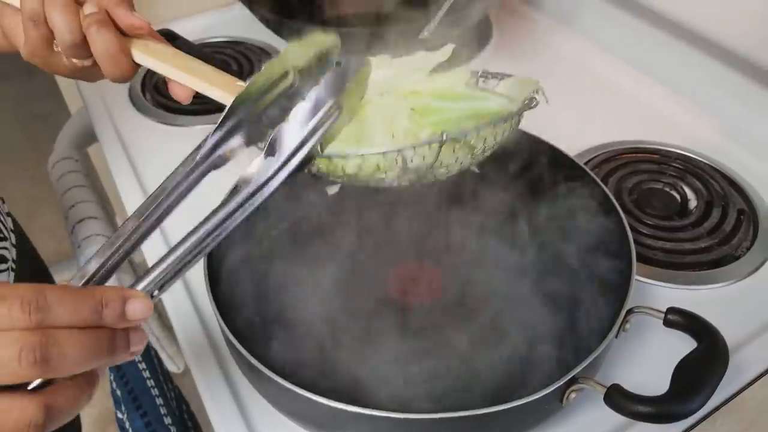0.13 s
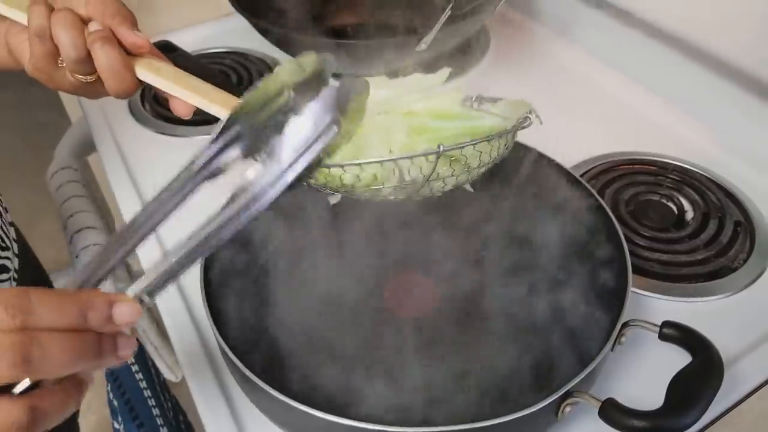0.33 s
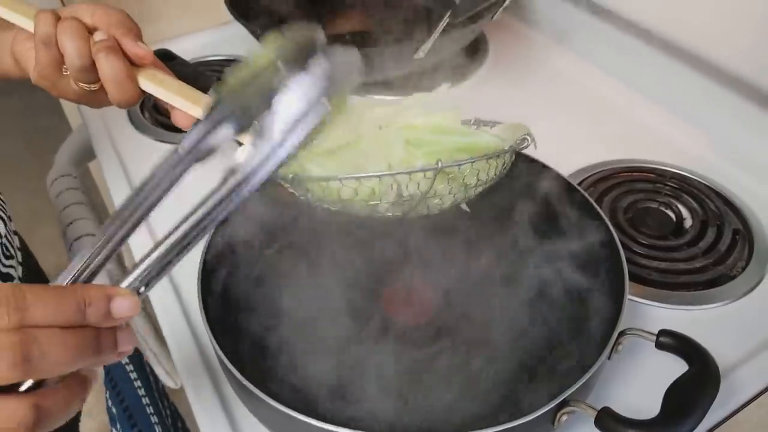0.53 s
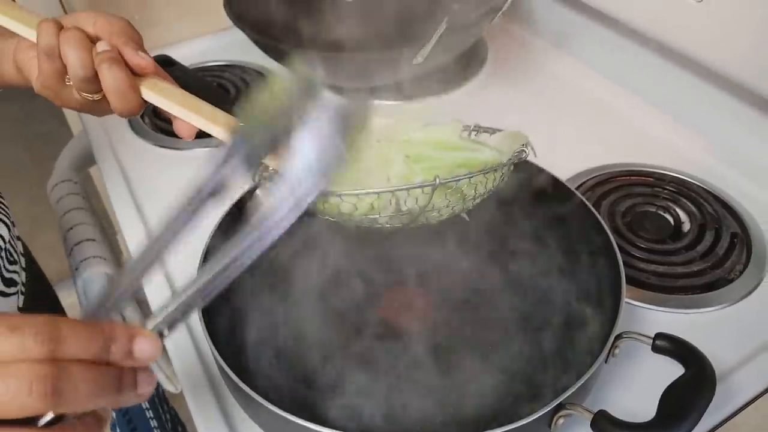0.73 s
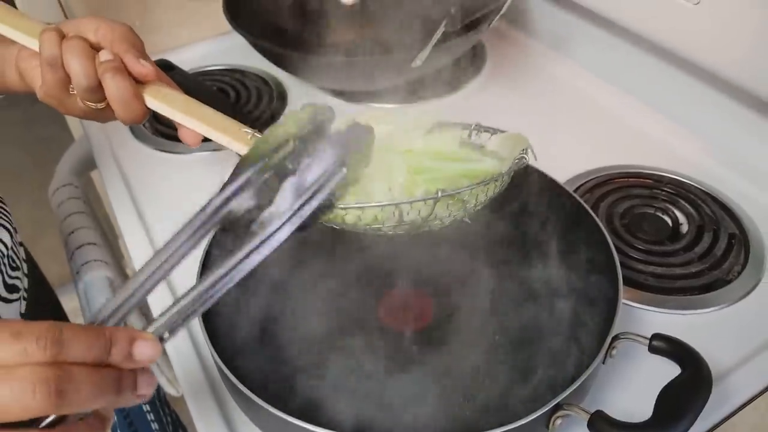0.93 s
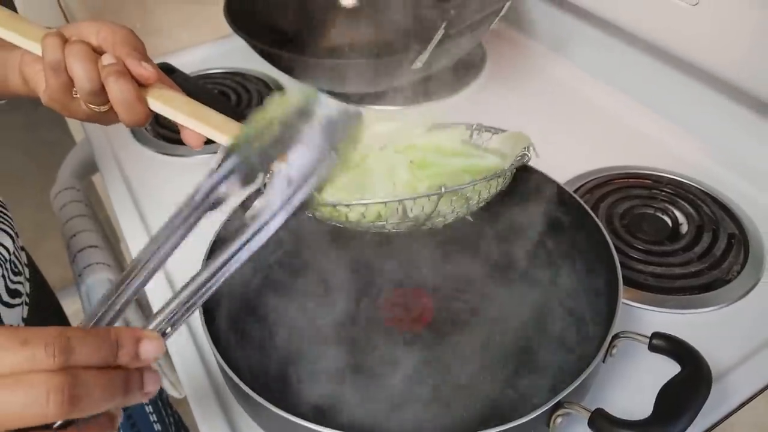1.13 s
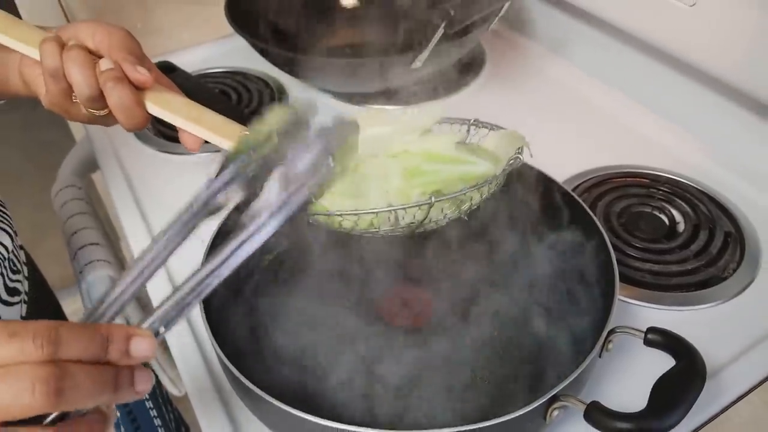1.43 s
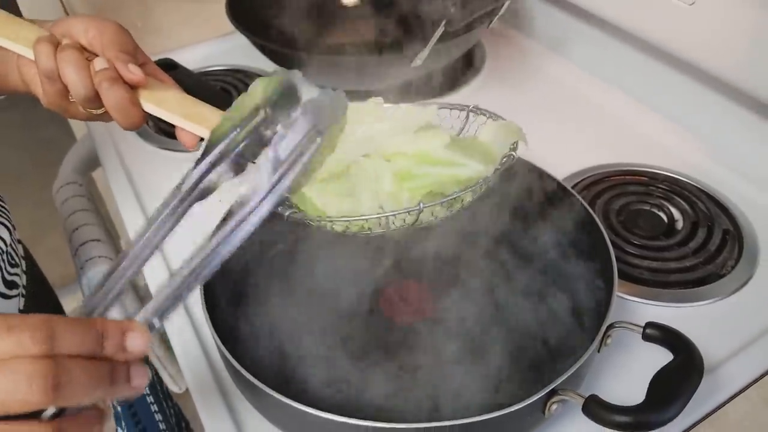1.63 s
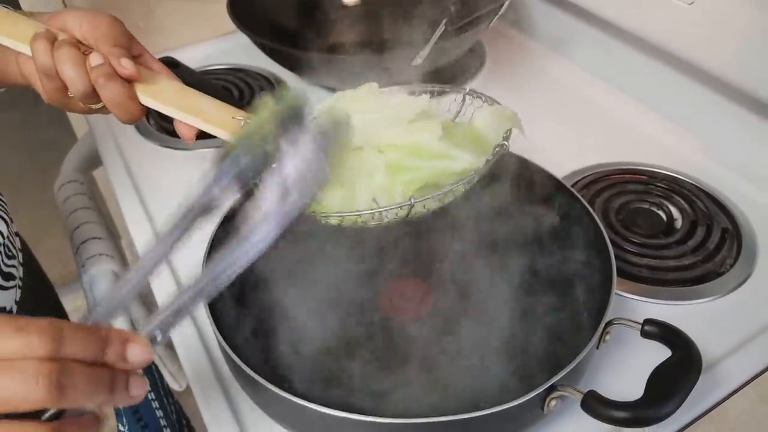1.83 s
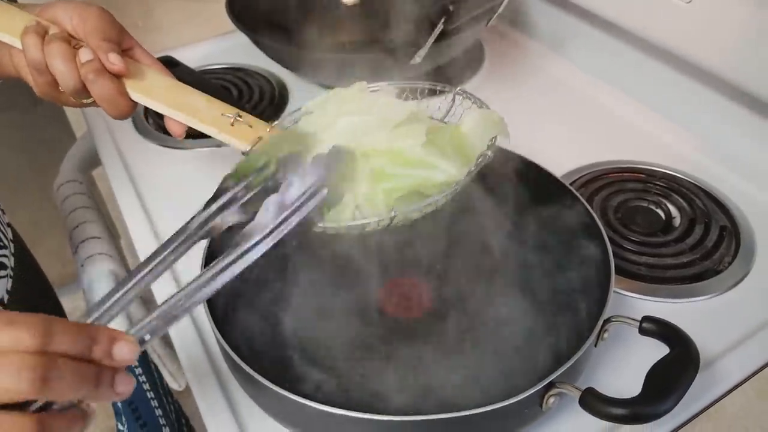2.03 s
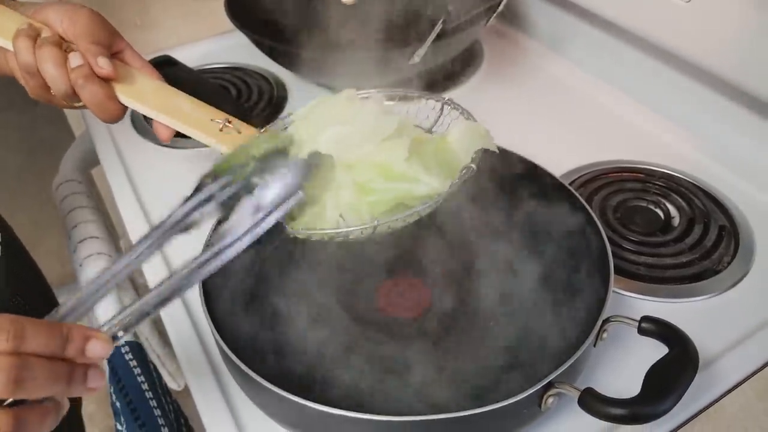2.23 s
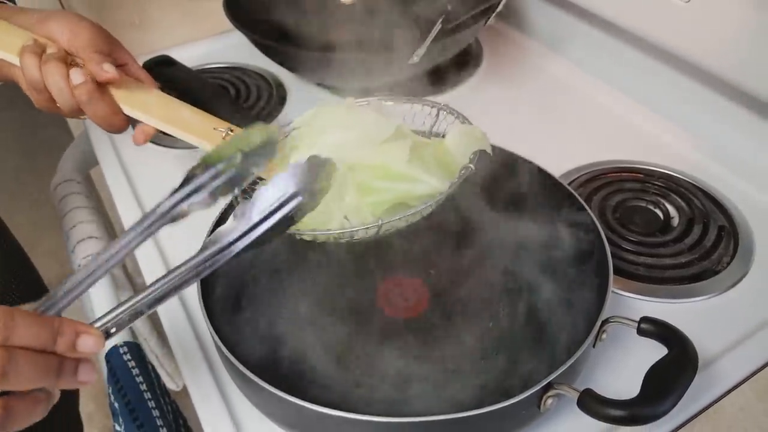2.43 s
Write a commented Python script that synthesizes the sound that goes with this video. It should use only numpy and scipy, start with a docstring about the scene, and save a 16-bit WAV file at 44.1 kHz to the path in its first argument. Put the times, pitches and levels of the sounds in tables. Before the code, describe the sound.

Quick, sharp metal clicks of tongs knocking against a wire basket of cabbage, over low room rumble

```python
"""A soft dull noise fades and the hiss swells briefly; then steel tongs tap a wire strainer of cabbage
over a wok, about six times a second. Each tap is a clash of many thin-steel modes (shaped noise lines)
plus decaying sine tones and a dull noise thud; often the loose arms clack again just after.
A small kitchen answers with a decaying noise reverb, over shaped-noise rumble, sine mains hum and
a faint noise hiss from the steaming wok."""
import sys
import numpy as np
from scipy import signal
from scipy.fft import rfft, irfft, next_fast_len
from scipy.io import wavfile
from scipy.ndimage import uniform_filter1d

SR = 44100
rng = np.random.default_rng(int(sys.argv[2]) if len(sys.argv) > 2 else 0)


def wrap_up_sound(samples):
    """Save the sound to the file named by the first command line argument, as 16-bit audio."""
    columns = np.atleast_2d(samples).T
    # keep every value between -1 and 1, then stretch to whole-number steps
    tamed = np.clip(columns, -1, 1)
    steps = np.round(tamed * 32767).astype(np.int16)
    wavfile.write(sys.argv[1], SR, steps)


N = 114660
TOP_HZ = 15900

# Room rumble: colour (frequency [Hz], level [dB]); left-right correlation (frequency [Hz], likeness [0..1])
RUMBLE_COLOUR = [(20, -19), (33, -10), (45, 1.5), (62, 4.5), (85, 1.5), (130, -1.5), (190, -3), (300, -5),
                 (500, -10), (800, -18.5), (1500, -27.5), (4000, -39.5)]
RUMBLE_LIKENESS = [(60, 1), (160, 0.79), (350, 0.77), (800, 0.25), (2000, 0.032)]
RUMBLE_DB = -56.5
# Mains hum lines (frequency [Hz], rms level [dB])
HUM_LINES = [(119.5, -61), (159.6, -65.5), (294, -69.5)]
# Wok hiss: colour (frequency [Hz], level [dB]); course (time [s], level [dB])
HISS_COLOUR = [(300, -28), (1000, -1), (2000, 5), (3000, -2), (6000, 5), (9000, -16), (15000, -7)]
HISS_COURSE = [(0, -69), (.035, -59.5), (.09, -80), (2.6, -74)]
BACKGROUND_LEFT_DB = 0.7  # rumble and hum lean left
# Opening noise colour (frequency [Hz], level [dB])
OPENING_COLOUR = [(100, -34), (200, -9), (290, 4), (450, -6.5), (750, -7.5), (1000, -17.5), (1800, -17.5),
                  (2500, -32), (8000, -31)]
OPENING_DB, OPENING_T60_S = -49, 0.48

# Room decay (frequency [Hz], t60 [s])
ROOM_T60_POINTS = [(300, 0.71), (2000, 0.33), (6000, .29), (10000, 0.26), (15000, .21)]
# Room colour (frequency [Hz], gain [dB])
ROOM_COLOUR_POINTS = [(300, -6), (2000, -0.5), (6000, 1), (10000, -1.5), (15000, -1.5)]
ROOM_DB, ROOM_DELAY_S, ROOM_BUILD_S = -1, 0.0017, 0.0022
ROOM_GRAIN_DB = 4.5  # reflections arrive with uneven strength
ROOM_RIGHT_DB = 0.26  # shimmer and contact reverb lean right

# Taps (time [s], level [dB], body [dB], bite [dB], treble [dB], ring of tone families 0, 1, 2 [dB each])
TAP_EVENTS = [(0.1492, -8, 5.5, 1, 1, -1, -17, 1), (0.2951, -1, 0.5, 2.5, 1, -2, 9.5, -17),
              (0.4567, -2, 4, 1.5, 1, 6, 2, -13), (0.6254, -0.5, 2.5, 0.5, 0.5, 2, -3, -8),
              (0.7736, -6, -0.5, -0.5, 1, 4, -7, -13), (0.9218, -1.5, 2.5, 1, 2, -3, -4, -13),
              (1.072, -4, 7.5, 2.5, 2, 9.5, 4.5, -12), (1.2044, -6.5, 3, 0, 2, -3, -5, -14),
              (1.3879, -9.5, -1, 5, 5.5, -15, 0.5, -7), (1.5478, -3.5, 1, 2, 3.5, -21, -0.5, -1),
              (1.7126, -4, 1, 1, 2, -1, -6, -22), (1.8834, -1, -4, 1.5, 1.5, -0.5, -6, 7),
              (2.0529, 0, -1, -2, -4, -11, -21, 5), (2.2002, -1.5, 3, 1.5, 0.5, -11, -5, 4),
              (2.3234, -7.5, 3.5, 1, 2, -4, -8, -18)]
# Clacks of the loose arms after a tap (time [s], level [dB])
CLACK_EVENTS = [(.4655, -6.5), (0.6354, -8), (.6418, -8.5), (.7775, -2.5), (.9392, -9.5), (1.0785, -9),
                (1.2085, -4.5), (1.2238, -7), (1.7190, -6), (1.8948, -5.5), (1.8975, -4.5), (2.0665, -7),
                (2.0725, -8), (2.2055, -8)]
CLACK_WITHIN_S = 0.03
# Centres of a tap's body, middle, bite and treble (frequency [Hz])
TAP_BAND_HZ = (1100, 2400, 5800, 13000)
SPOT_RIPPLE_DB = 1.4

# Thud of the filled basket: colour (frequency [Hz], level [dB])
THUD_COLOUR = [(100, -21), (250, -13), (400, -1), (600, -7), (780, 3), (1000, -13.5), (1600, -24),
               (5000, -45)]
THUD_DB, THUD_T60_S = -40.5, 0.11
# Steel contact colour (frequency [Hz], gain [dB])
STEEL_COLOUR = [(150, -20.5), (500, -18.5), (780, -12), (1000, -14), (1320, -8.5), (1650, -11), (2000, 3),
                (2600, 0), (3200, 3), (4400, -1), (6000, 2), (7400, 0), (9200, -5), (10500, -0.5),
                (12500, 2.5), (14300, 3), (15600, 1.5), (17000, -3)]
# Crack colour (frequency [Hz], gain [dB])
CRACK_COLOUR_POINTS = [(2000, -7), (6000, -10.5), (10000, -14), (13500, 2.5)]
CRACK_DB, CRACK_T60_S = -19.5, 0.0049
CLASH_DB, CLASH_T60_S, CLASH_RISE_S = -26, 0.045, 0.00011
SHIMMER_DB, SHIMMER_T60_S = -36.5, 0.16  # small modes that ring on
LEFT_DB, RIGHT_LAG_S = 3, 0.0003

# Steel tones, one entry each: (frequency [Hz]), (level [dB]), (t60 [s])
RING_HZ = [3143, 3230, 3523, 3619, 4213, 5797, 6030, 2018, 5035, 1319, 2108, 2230, 2483, 4910, 7295, 13437,
           14190]
RING_DB = [-40.5, -38, -50.5, -56, -47.5, -46.5, -49, -50, -35, -50, -45, -45.5, -51.5, -54, -43, -47, -55]
RING_T60_S = [0.13, 0.074, 0.24, .18, 0.15, 0.098, 0.3, 0.25, 0.066, 0.092, 0.087, 0.11, .2, 0.21, 0.092,
              .12, .1]
# Tones excited together (family [index]; 3 = no per-tap setting)
RING_FAMILY = [0, 0, 1, 1, 1, 1, 1, 2, 2, 3, 3, 3, 3, 3, 3, 3, 3]
RING_SCATTER_DB, RING_RISE_S, RING_ROOM_DB = 2, 0.00042, -10


def amp(db):
    """Decibels to gain."""
    return 10 ** (np.asarray(db) / 20)


def unit(x):
    """Scale to rms 1."""
    return x / np.sqrt(np.mean(x ** 2) + 1e-20)


def along(points, hz):
    """Interpolate (Hz, value) points on a log-frequency axis."""
    point_hz, value = np.transpose(points)
    return np.interp(np.log(hz + 1), np.log(point_hz + 1), value)


def fade(t, t60):
    """Exponential decay, 60 dB down after t60."""
    return np.exp(-np.log(1000) * t / t60)


def filtered(x, response):
    """Zero-phase filter by a response of frequency."""
    size = next_fast_len(x.shape[-1] + SR // 10)
    spectrum = rfft(x, size) * response(np.fft.rfftfreq(size, 1 / SR))
    return irfft(spectrum, size)[..., :x.shape[-1]]


def coloured(x, points, size=2048):
    """Minimum-phase filter with the given (Hz, dB) colour."""
    cepstrum = irfft(np.log(amp(along(points, np.fft.rfftfreq(size, 1 / SR)))))
    cepstrum[1:size // 2] *= 2  # fold to causal
    cepstrum[size // 2 + 1:] = 0
    impulse = irfft(np.exp(rfft(cepstrum)))
    return signal.fftconvolve(x, impulse[None], axes=1)[:, :x.shape[1]]


def add(track, start_s, x):
    """Mix x into the track at start_s."""
    i = round(start_s * SR)
    track[:, i:i + x.shape[1]] += x[:, :N - i]


def shaped_noise(points):
    """Stereo noise of the given (Hz, dB) colour at rms 1."""
    return unit(filtered(rng.standard_normal((2, N)), lambda hz: amp(along(points, hz))))


def rumble():
    """Room rumble: mid and side noise mixed to the set left-right correlation per frequency."""
    def mid_side(hz):
        angle = np.arccos(np.clip(along(RUMBLE_LIKENESS, hz), -1, 1)) / 2
        return amp(along(RUMBLE_COLOUR, hz)) * np.array([np.cos(angle), np.sin(angle)])

    mid, side = filtered(rng.standard_normal((2, N)), mid_side)
    return amp(RUMBLE_DB) * unit(np.array([mid + side, mid - side]))


def hum():
    """Appliance hum: steady sines of random phase."""
    t = np.arange(N) / SR
    return sum(amp(db) * np.sqrt(2) * np.sin(2 * np.pi * (hz * t + rng.random())) for hz, db in HUM_LINES)


def hiss():
    """Steaming wok: shaped noise following a level course."""
    level_db = np.interp(np.arange(N) / SR, *np.transpose(HISS_COURSE))
    return shaped_noise(HISS_COLOUR) * amp(level_db)


def background():
    """Rumble and hum leaning left, plus hiss."""
    lean = amp([[BACKGROUND_LEFT_DB], [-BACKGROUND_LEFT_DB]])
    return (rumble() + hum()) * lean + hiss()


def opening():
    """Soft dull noise decaying exponentially from the start."""
    return amp(OPENING_DB) * shaped_noise(OPENING_COLOUR) * fade(np.arange(N) / SR, OPENING_T60_S)


def kitchen(x):
    """Room reverb: grainy diffuse noise tail whose treble decays first."""
    reflections = rng.standard_normal(x.shape)
    grain = unit(uniform_filter1d(rng.standard_normal(x.shape), size=24))
    hz, t, bins = signal.stft(reflections * amp(ROOM_GRAIN_DB * grain), SR, nperseg=256)
    decay = fade(t, along(ROOM_T60_POINTS, hz)[:, None])
    tail = signal.istft(bins * decay, SR, nperseg=256)[1]
    since_delay_s = np.maximum(np.arange(tail.shape[1]) / SR - ROOM_DELAY_S, 0)
    tail *= 1 - np.exp(-since_delay_s / ROOM_BUILD_S)
    tail /= np.linalg.norm(tail, axis=1, keepdims=True)
    wet = signal.fftconvolve(x, tail, axes=1)[:, :x.shape[1]]
    return amp(ROOM_DB) * coloured(wet, ROOM_COLOUR_POINTS)


def thud(t):
    """Dull knock of the cabbage basket: short decaying noise."""
    return amp(THUD_DB) * coloured(fade(t, THUD_T60_S) * rng.standard_normal((1, len(t))), THUD_COLOUR)


def crowd(modes_hz, t):
    """Many close modes struck with random strengths, independent on each side."""
    lines = np.zeros((2, len(t) // 2 + 1), complex)
    shape = (2, len(modes_hz))
    strength = rng.standard_normal(shape) + 1j * rng.standard_normal(shape)
    lines[:, (modes_hz * len(t) / SR).astype(int)] = strength
    return unit(irfft(lines, len(t)))


def contact(modes_hz, t):
    """Steel on steel, left of centre: crack, quickly damped clash, shimmer and room."""
    crack_noise = fade(t, CRACK_T60_S) * rng.standard_normal((1, len(t)))
    crack = amp(CRACK_DB) * coloured(crack_noise, CRACK_COLOUR_POINTS)
    clash = amp(CLASH_DB) * fade(t, CLASH_T60_S) * crowd(modes_hz, t)
    shimmer = amp(SHIMMER_DB) * fade(t, SHIMMER_T60_S) * crowd(modes_hz, t)
    near = (crack + clash) * (1 - np.exp(-t / CLASH_RISE_S))
    right = np.pad(near[1], (round(RIGHT_LAG_S * SR), 0))[:len(t)]
    direct = np.array([amp(LEFT_DB) * near[0], amp(-LEFT_DB) * right])
    lingering = (shimmer + kitchen(near)) * amp([[-ROOM_RIGHT_DB], [ROOM_RIGHT_DB]])
    return coloured(direct + lingering, STEEL_COLOUR)


def ring(extra_db, t):
    """Decaying steel tones, a quarter cycle apart between sides, plus room."""
    hz, db, t60 = np.array([RING_HZ, RING_DB + extra_db, RING_T60_S])[:, :, None]
    phase = rng.uniform(0, 2 * np.pi, hz.shape)
    skew = rng.choice([-1, 1], hz.shape) * np.pi / 2
    level = amp(db) * fade(t, t60) * (1 - np.exp(-t / RING_RISE_S))
    tones = np.array([(level * np.sin(2 * np.pi * hz * t + phase + side * skew)).sum(0) for side in (0, 1)])
    return tones + amp(RING_ROOM_DB) * kitchen(tones)


def spot(count=70):
    """Struck spot favours some mode groups: random (Hz, dB) ripple."""
    return list(zip(np.linspace(0, TOP_HZ, count), SPOT_RIPPLE_DB * rng.standard_normal(count)))


def tongs(count=260):
    """Taps and their clacks on one set of modes; spot, colour and ring levels change per tap."""
    out, t = np.zeros((2, N)), np.arange(SR // 2) / SR
    modes_hz = (np.arange(count) + rng.random(count)) * TOP_HZ / count
    for start_s, tap_db, body_db, bite_db, treble_db, *family_db in TAP_EVENTS:
        colour = list(zip(TAP_BAND_HZ, (body_db, 0, bite_db, treble_db)))
        scatter_db = RING_SCATTER_DB * rng.standard_normal(len(RING_HZ))
        ring_db = np.append(family_db, 0)[list(RING_FAMILY)] + scatter_db
        ripple = spot()
        add(out, start_s, amp(tap_db + body_db) * thud(t))
        clacks = [c for c in CLACK_EVENTS if 0 < c[0] - start_s < CLACK_WITHIN_S]
        for hit_s, hit_db in [(start_s, tap_db)] + clacks:
            steel = coloured(contact(modes_hz, t), ripple) + ring(ring_db, t)
            add(out, hit_s, amp(hit_db) * coloured(steel, colour))
    return out


def scene():
    """Tapping, background and opening noise."""
    return tongs() + background() + opening()


def record(dry):
    """Steep low-pass, 3 dB down at TOP_HZ."""
    return filtered(dry, lambda hz: 1 / np.sqrt(1 + (hz / TOP_HZ) ** 160))


dry = scene()
out = record(dry)
wrap_up_sound(out)
```